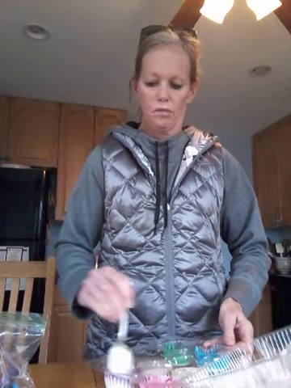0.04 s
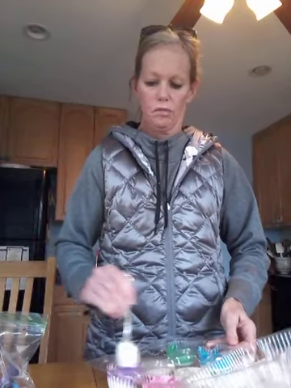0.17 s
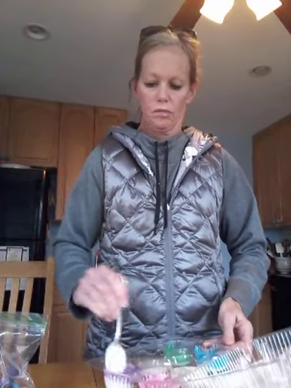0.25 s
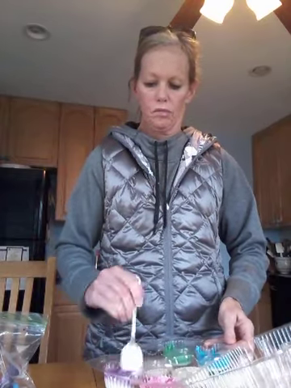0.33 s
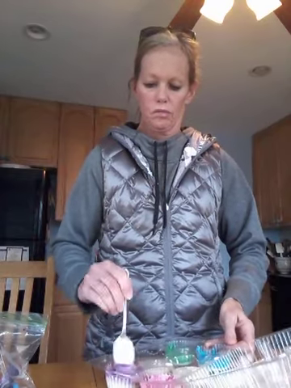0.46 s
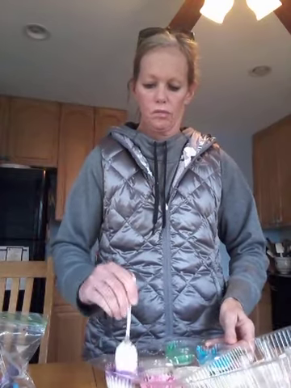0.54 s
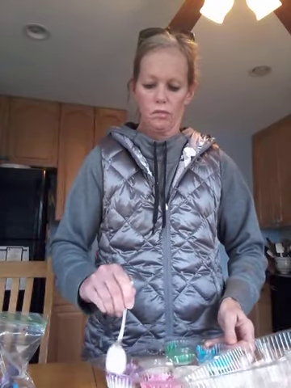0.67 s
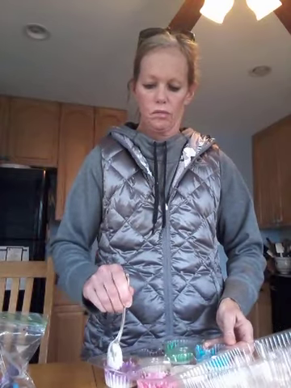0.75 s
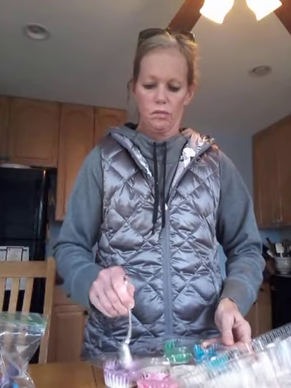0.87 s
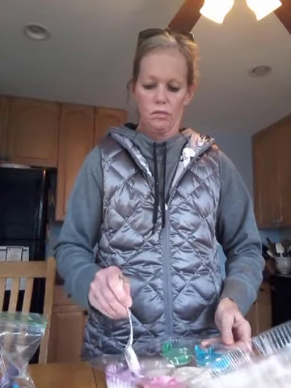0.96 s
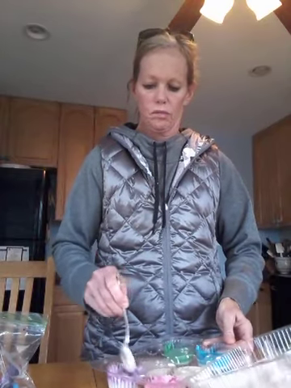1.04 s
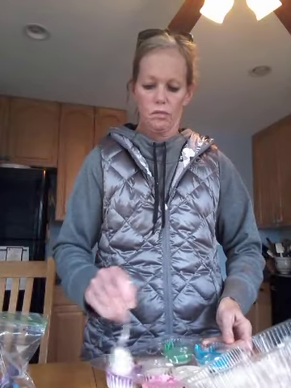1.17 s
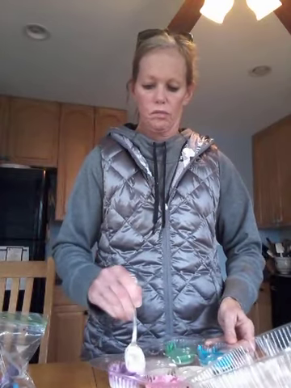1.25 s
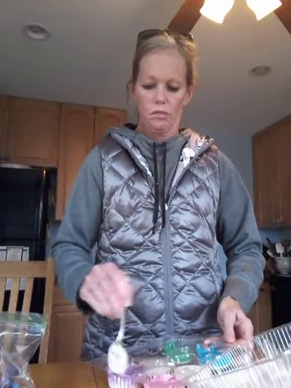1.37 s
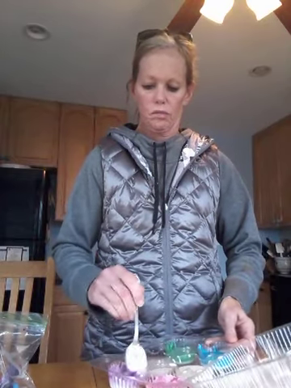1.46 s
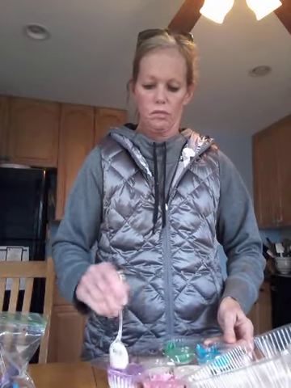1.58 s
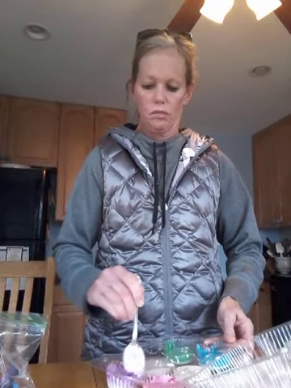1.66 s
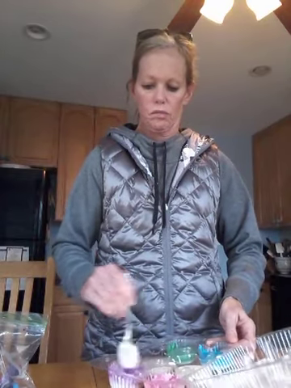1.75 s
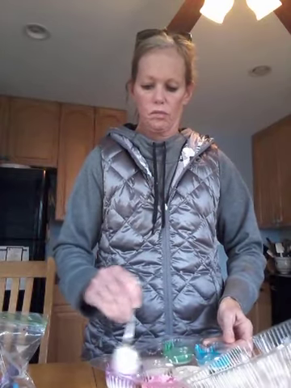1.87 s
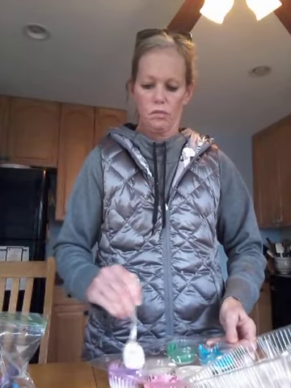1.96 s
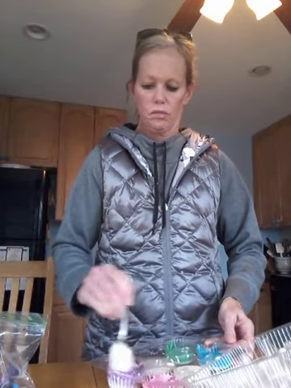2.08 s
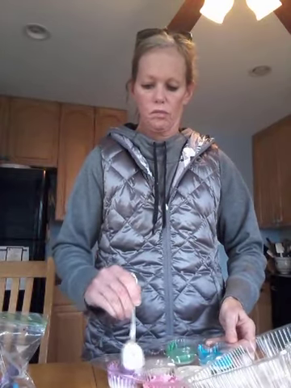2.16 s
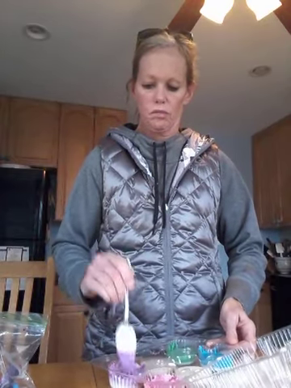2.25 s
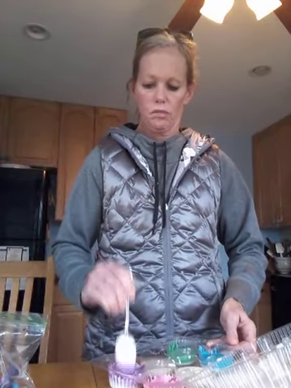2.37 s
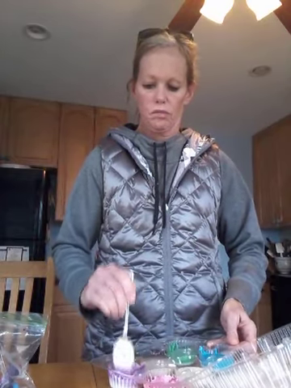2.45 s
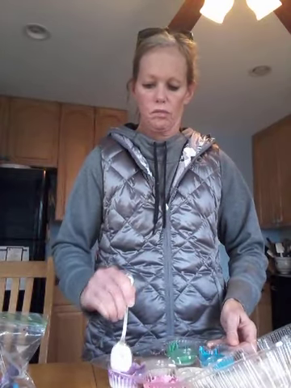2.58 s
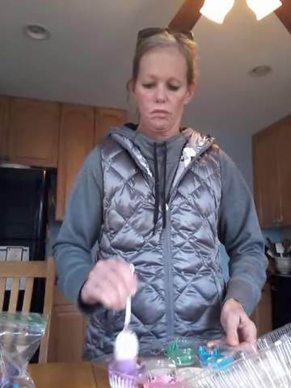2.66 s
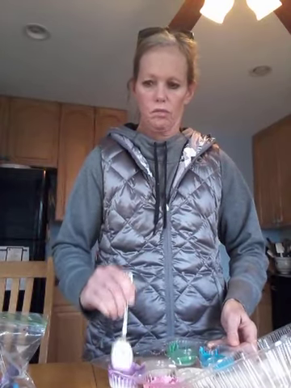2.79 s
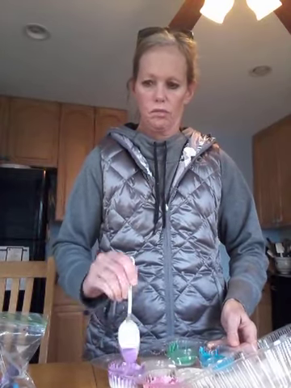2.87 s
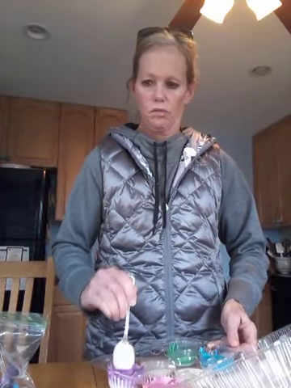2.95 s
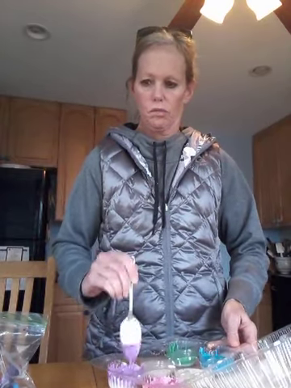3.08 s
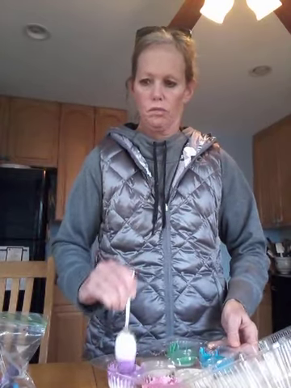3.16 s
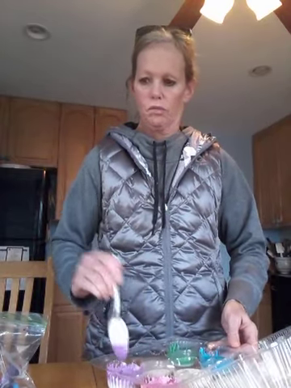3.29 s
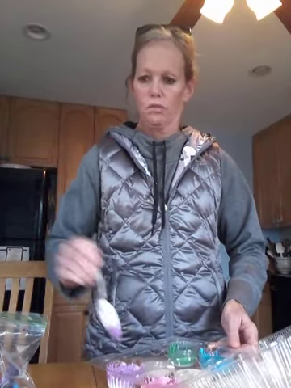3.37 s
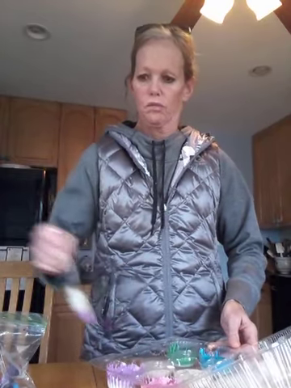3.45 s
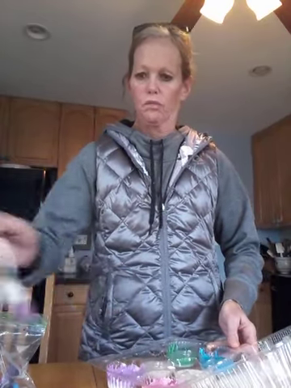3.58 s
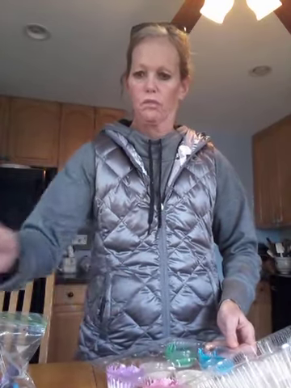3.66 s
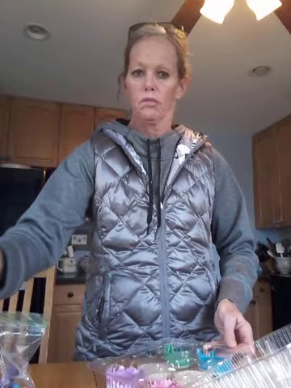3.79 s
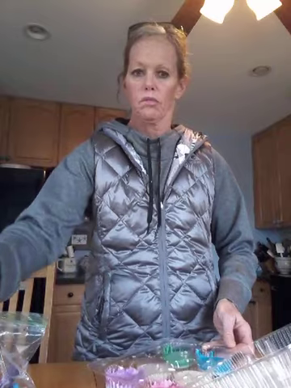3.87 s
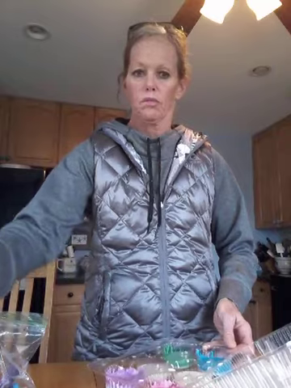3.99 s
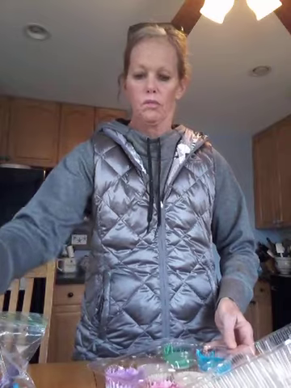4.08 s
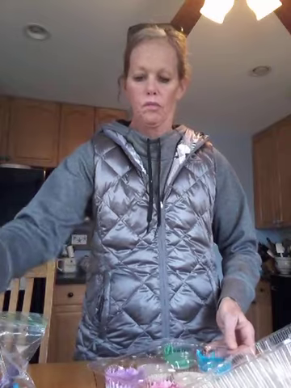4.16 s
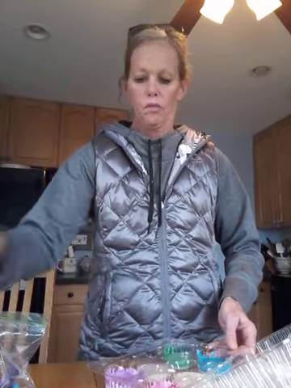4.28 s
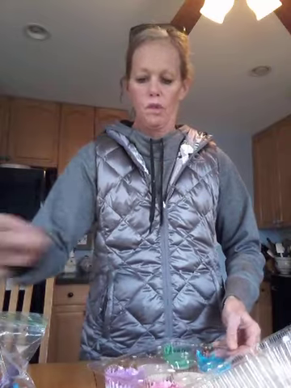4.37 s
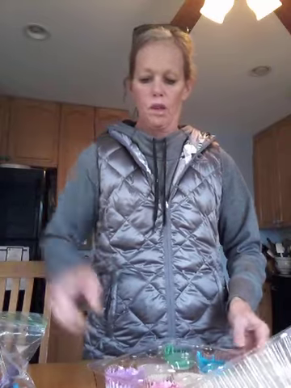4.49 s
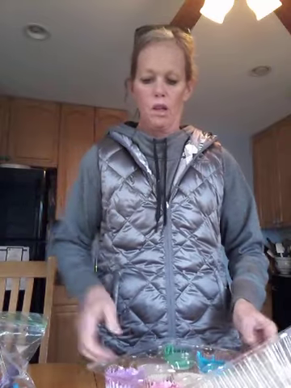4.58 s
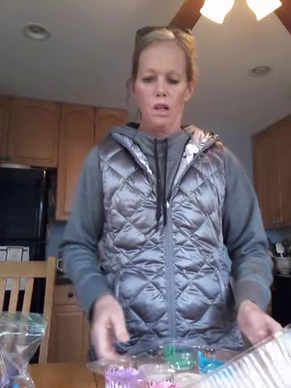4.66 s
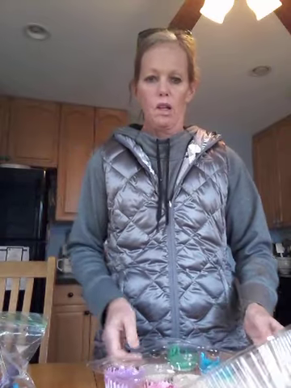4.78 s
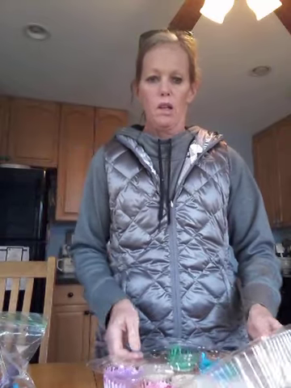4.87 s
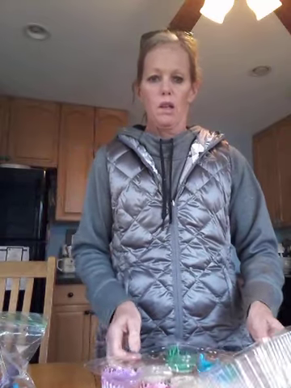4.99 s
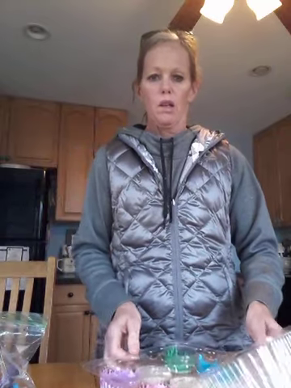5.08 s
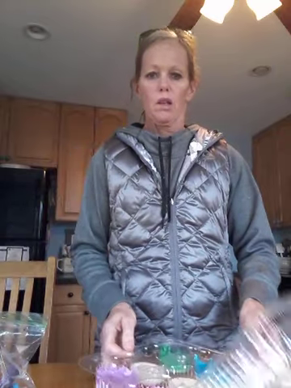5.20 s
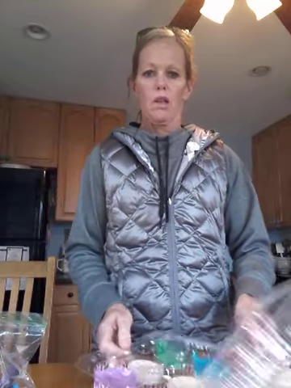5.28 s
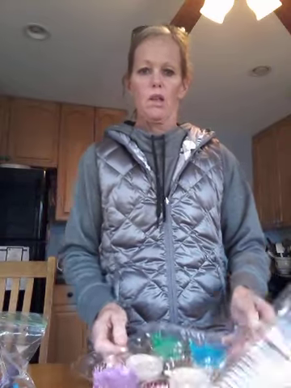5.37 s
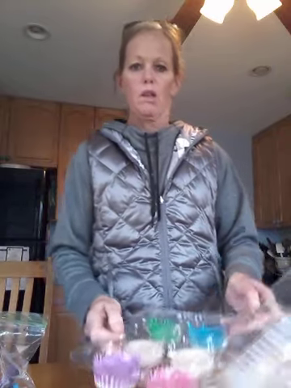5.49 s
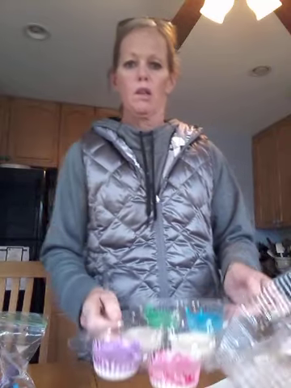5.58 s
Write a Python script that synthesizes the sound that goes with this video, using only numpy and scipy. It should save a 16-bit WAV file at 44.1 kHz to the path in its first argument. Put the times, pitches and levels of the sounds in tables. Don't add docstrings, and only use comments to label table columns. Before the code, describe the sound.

Close to a phone in a hard-walled kitchen, a spoon stirs thick stuff in a pleated paper cup with rapid crisp snaps, rasps and dull thumps. Four loud knocks make the wooden table ring, followed by a brighter rim tap. After a brush of sleeve, the spoon drops farther off, bouncing and rattling. Finally a thin plastic tray ticks and scuffs quietly over a faint appliance hum.

```python
import sys
import numpy as np
from scipy import signal
from scipy.fft import rfft, irfft
from scipy.io import wavfile
from scipy.ndimage import uniform_filter1d

SR = 44100
rng = np.random.default_rng(int(sys.argv[2]) if len(sys.argv) > 2 else 0)


def materialize(psi):
    bounded = np.clip(np.atleast_2d(psi).T, -1, 1)
    quanta = np.round(bounded * 32767).astype(np.int16)
    wavfile.write(sys.argv[1], SR, quanta)


def invert_db(x):
    u = np.asarray(x, float) / 20
    return 10 ** u


N = 248590
BODY_HZ, SNAP_HZ, AIR_HZ = (1200, 2800), (2800, 9000), (9000, 17000)


def band(x, lo_hz, hi_hz):
    sos = signal.butter(2, [lo_hz, min(hi_hz, .45 * SR)], "band", fs=SR, output="sos")
    return signal.sosfilt(sos, x)


def colour(x, points):
    hz, db = np.transpose(points)
    grid_hz = np.arange(1, 2050) * SR / 4096
    cepstrum = irfft(np.interp(np.log(grid_hz), np.log(hz), db) * np.log(10) / 20)
    cepstrum[1:2048] *= 2
    cepstrum[2049:] = 0
    return signal.fftconvolve(x, irfft(np.exp(rfft(cepstrum))))[:len(x)]


def die_away(t, t60):
    return np.exp(-np.log(1000) * t / t60)


def bursts(s, db, ms, rough):
    out, t = np.zeros(N + 4096), np.arange(2048) / SR
    noises = rng.standard_normal((len(s), 2048))
    for at, gain, length, noise in zip(s, invert_db(np.array(db)), np.broadcast_to(ms, len(s)), noises):
        trail = noise * np.exp(-1000 * t / max(length, .05))
        shape = rough * trail / np.sqrt(np.sum(trail ** 2))
        shape[0] -= 1
        start = int(at * SR)
        out[start:start + 2048] += gain * shape / np.sqrt(1 + rough ** 2)
    return out[:N]


def edges(s, db, ms):
    smear, reflection = .6, .22
    out, click = np.zeros(N + 1024), np.eye(1, 1024)[0]
    for at, gain, shares in zip(s, invert_db(np.array(db)), rng.random((len(s), 3))):
        lags = 2 + (shares * ms * SR / 2000).astype(int)
        shape = click - reflection * np.roll(click, lags[2])
        for lag in lags[:2]:
            loop = np.r_[1, np.zeros(lag - 1), -smear]
            shape = signal.lfilter(loop[::-1], loop, shape)
        start = int(at * SR)
        out[start:start + 1024] += gain * shape
    return out[:N]


def contact(strength_db, sharpness):
    fall_db = 13
    return [strength_db - fall_db * (step - sharpness) ** 2 for step in range(3)]


def hits(blows, top_hz, ms, rough, thud_db, body_db, snap_db, air_db):
    s, snap, thud, body, air = np.transpose(blows)[:5]
    force = bursts(s, thud + thud_db, ms, rough)
    low = band(force, 120, top_hz) - band(bursts(s, body + body_db, 3.1 * ms, rough), *BODY_HZ)
    edge = band(edges(s, snap + snap_db, 0.91), *SNAP_HZ) - band(edges(s, air + air_db, 1.2), *AIR_HZ)
    return force, low + edge


def strokes(rows, column):
    attack_s, fade_db_per_s = 0.0025, 285.5
    t, gain = np.arange(N) / SR, 0
    for row in rows:
        start, length = row[:2]
        fade_db = fade_db_per_s * np.maximum(t - start - length, 0)
        gain = gain + np.clip((t - start) / attack_s, 0, 1) * invert_db(row[column] - fade_db)
    return gain


def grains(gain, per_s, spread_db):
    size = rng.standard_normal(N) * invert_db(spread_db * rng.exponential(size=N))
    size = size * (rng.random(N) < per_s / SR)
    return size / np.std(size) * gain


def notes(rows):
    attack_ms = 1.0
    out, t = np.zeros(N + SR // 2), np.arange(SR // 2) / SR
    for s, db, hz, ms in rows:
        swell = die_away(1000 * t, ms) * (1 - np.exp(-1000 * t / attack_ms))
        start = int(s * SR)
        out[start:start + len(t)] += invert_db(db) * swell * np.sin(2 * np.pi * hz * t)
    return out[:N]


def ring(x, modes, shorten):
    t = np.arange(SR) / SR
    body = sum(invert_db(db) * np.sin(2 * np.pi * hz * t) * die_away(t, t60 * shorten) for hz, db, t60 in modes)
    return signal.fftconvolve(x, body)[:N]


def wood(x, t60, top_hz):
    t = np.arange(SR // 2) / SR
    body = band(rng.standard_normal(len(t)), 140, top_hz) * die_away(t, t60)
    return signal.fftconvolve(x, body / np.sqrt(np.sum(body ** 2)))[:N]


# [f/Hz, level/dB, t60/s]
FRAME = [(65, -4, .8), (139, -1, .6)]
# [level/dB, t60/s]
LOW_BOARDS_HZ = [194, 240, 296, 333, 511, 571, 638, 700, 806, 867, 910, 1007, 1115, 1190]
LOW_BOARDS = [(-3.5, .3), (-10.5, 0.49), (-3, 0.39), (-6.5, 0.41), (-5.5, 0.4), (-5, 0.49), (-21.5, 0.79),
              (-21, 1), (-2.5, 0.13), (-10.5, 0.7), (-26.5, 0.4), (-5.5, 0.41), (-11, .4), (-16, 0.33)]
# [level/dB, t60/s]
HIGH_BOARDS_HZ = [1265, 1375, 1416, 1470, 1700, 1770, 1810, 2050, 2175, 2240, 2290, 2350]
HIGH_BOARDS = [(-24, 0.37), (-12.5, 0.76), (-38, 0.65), (-27, 0.44), (-25, 0.32), (-19, 0.24),
               (-14.5, 0.59), (-12, 0.27), (-20, 0.32), (-12, 0.28), (-19.5, 0.44), (-22, 0.27)]


def table(force, frame_db, boards_db, shorten):
    pitches = zip(LOW_BOARDS_HZ + HIGH_BOARDS_HZ, LOW_BOARDS + HIGH_BOARDS)
    boards = [(hz, db + boards_db, t60) for hz, (db, t60) in pitches]
    gaps_hz = rng.uniform(12, 28, size=len(boards)) * (-1) ** np.arange(len(boards))
    twins = [(hz + gap, db - 5, t60) for (hz, db, t60), gap in zip(boards, gaps_hz)]
    frame = [(hz, db + more, t60) for (hz, db, t60), more in zip(FRAME, frame_db)]
    return ring(force, boards + twins + frame, shorten)


# [f/Hz, level/dB per Hz]
HUM = [(26, -47), (45, -10.5), (81, -1), (267, -10.5), (309, -1.5), (406, -19), (633, -16), (681, -15),
       (734, -15), (1430, -16.5), (4450, -23), (6300, -17.5), (9580, -29.5), (15300, -28), (16500, -46)]


def room_tone():
    noise = colour(rng.standard_normal(N), HUM)
    steps = np.repeat(rng.standard_normal(N // 4000 + 1), 4000)[:N]
    drift_db = 1.5 * uniform_filter1d(steps, size=6000)
    return noise / np.std(noise) * invert_db(-53 - 6.5 + drift_db)


# [lowest f/Hz, t60/s, level/dB]
KITCHEN = [(159, 0.38, 1), (267, 0.45, 1), (620, 0.44, 2), (1047, 0.5, -4), (2620, 0.36, -0.5),
           (4970, 0.37, -2.5), (7800, 0.19, -7), (12200, 0.38, -10.5)]
# [delay/ms, level/dB]
ECHOES = [
    (2.0, -9),
    (19.0, -27),
    (26.0, -26),
]


def kitchen(build_ms, wet_db):
    t = np.arange(int(.8 * SR)) / SR
    tail, tops = 0, [row[0] for row in KITCHEN[1:]] + [18000]
    for (lo, t60, db), hi in zip(KITCHEN, tops):
        fall = die_away(t, t60) * (1 - np.exp(-1000 * t / build_ms))
        noise = band(rng.standard_normal(len(t)), lo, hi)
        tail = tail + invert_db(db + wet_db) * noise * fall / np.sqrt(np.sum(fall ** 2))
    tail[0] += 1
    for ms, db in ECHOES:
        start = int(ms * SR / 1000)
        tail[start:start + 24] += invert_db(db) * rng.standard_normal(24) / 5
    return tail


# [t/s, snap level/dB, thud level/dB, body level/dB, air level/dB]
TRAY = [
    (4.4555, -14, -24.5, -16.5, -50),
    (4.6915, -45, -25.5, -25.5, -54),
    (5.0207, -34, -32, -27.5, -51),
    (5.1092, -41.5, -46, -23, -59),
    (5.5373, -45, -56, -45, -37),
    (5.5466, -39, -64, -48, -34),
    (5.566, -42, -45, -47, -35),
    (5.5969, -30, -34.5, -43, -54),
    (5.606, -43, -38, -51, -61),
]
# [f/Hz, level/dB, t60/s]
TRAY_MODES = [(335, -17, 0.043), (493, -19.5, 0.24), (700, -5, 0.086), (878, 4, 0.035), (1370, 0.5, 0.045)]
# [t/s, level/dB, f/Hz,
# t60/ms]
TRAY_NOTES = [(4.457, -49, 67, 300), (4.455, -39, 1104, 29.8), (4.47, -54, 459, 200), (4.69, -45, 638, 40),
              (4.776, -53.5, 920, 30), (4.82, -54, 815, 30), (4.87, -39.5, 448, 40), (4.872, -50, 1130, 30),
              (4.895, -51, 890, 40), (4.974, -46, 904, 30), (5.019, -52, 700, 30),
              (5.106, -46.5, 660, 50.5), (5.15, -59.5, 830, 91.6), (5.597, -56, 189, 60)]
# [t/s, length/s, rasp level/dB, drag level/dB]
REACH = [
    (3.6, 0.076, -62.5, -53),
    (3.72, 0.17, -66.5, -58.5),
    (3.86, 0.0074, -64, -49.5),
    (3.895, 0.05, -86.5, -51),
]
# [t/s, length/s, rasp level/dB, drag level/dB]
SHIFT = [
    (4.471, 0.02, -62, -47),
    (4.69, 0.14, -58.5, -65),
    (4.779, 0.011, -49.5, -44),
    (4.862, 0.0046, -42, -33.5),
    (4.9, 0.088, -58.5, -61),
    (5.02, 0.06, -55, -47),
    (5.1, 0.086, -60.5, -45.5),
    (5.188, 0.016, -51.5, -63),
    (5.531, .05, -76, -76),
    (5.595, 0.0092, -58.5, -49),
]


def tray():
    force, crack = hits(TRAY, 1200, 7.8, 4.3, 9.2, 8.2, 5.6, 14.0)
    force = force + invert_db(-4.5) * grains(strokes(SHIFT, column=3), 3700, 1.6)
    rub = invert_db(1.5) * band(grains(strokes(REACH + SHIFT, column=2), 9600, 1.2), 710, 8700)
    knocks = band(crack + invert_db(-35.0) * ring(force, TRAY_MODES, 0.38), 170, 6100)
    return knocks + rub + notes(TRAY_NOTES)


# [t/s, strength level/dB, sharpness, thud level/dB, ring over snap level/dB]
DROPS = [(3.647, -31, -6, -36, -26), (3.862, -31.5, 0.5, -30, -24), (3.897, -37, 1, -10.5, -19),
         (3.9438, -44, 1, -19, -26), (4.0252, 2, 6.5, 0, -40), (4.029, -0.5, -1.27, -4.5, -40),
         (4.0332, -16.5, -1, -20.5, -46.5), (4.043, -15.5, 0.5, -8.5, -42), (4.051, -2, 5, -20, -36),
         (4.054, -24.5, 0, -18.5, -41), (4.0559, -7, 5.5, -9.5, -42), (4.127, 4.5, 1.65, -3, -14.5),
         (4.149, -29, 4, -14, -16), (4.2558, -1, 1.29, -14, -35), (4.424, -30, -6.5, -37, -32.5)]
# [t/s, level/dB, length/ms]
CHATTER = [
    (4.0237, -17, 3.6),
    (4.028, -18, 3),
    (4.0337, -17, 2.6),
    (4.035, -34, 2.7),
    (4.042, -30, 3),
    (4.0455, -32, 4),
    (4.0498, -22.5, 2.9),
    (4.053, -30, 3.3),
    (4.0575, -45, 2.7),
]
# [f/Hz, level/dB, t60/s]
HANDLE = [(4180, -14, .02), (5610, -13, .012), (6060, -12, .015), (8370, -5, .008), (9320, -5, .008),
          (9860, -6, .008), (10900, -5, .006), (12000, -6, .006)]
SPOON = [(2030, -6, .018), (2880, -3, .018), (4230, -5, .045), (5450, -3, .015), (6560, -8, .025),
         (7770, -8, .03), (9200, -12, .025), (10900, -7, .015)]
COUNTER = [(76.6, -9.5, 0.72), (142.4, -12, 0.78), (182, -3, 0.078), (241.8, -13, 0.67), (340, -6, 0.042),
           (408, -8.5, 0.048), (578, 1.5, 0.054), (780, -2.5, 0.048), (860, -0.5, 0.044), (1128, 0.5, 0.08)]
# [t/s, level/dB, f/Hz, t60/ms]
FALL_NOTES = [(3.875, -40.5, 195, 90), (3.862, -37, 70.6, 180), (4.025, -4, 860, 13.2),
              (4.0252, -14, 1330, 9.8), (4.127, -12, 2880, 18.4), (4.127, -15, 5170, 18),
              (4.256, -20.5, 4960, 21), (4.256, -27, 8500, 19), (4.0255, -27.5, 229, 72),
              (4.029, -19, 413, 35), (4.042, -21.5, 311, 60), (4.044, -23.5, 139.6, 41),
              (4.058, -36.5, 341, 44), (4.148, -24, 2960, 15),
              (4.034, -15, 11600, 13), (4.036, -22.5, 9330, 20), (4.045, -25, 5460, 34),
               (4.0445, -35.5, 5750, 33), (4.049, -19.5, 8250, 23), (4.05, -13.5, 9400, 22),
               (4.128, -22.5, 6760, 25), (4.127, -9.5, 10770, 17), (4.256, -19.5, 2100, 12),
               (4.258, -20, 2910, 12)]


def dropped_spoon():
    s, strength, sharpness, thud, ringing = np.transpose(DROPS)
    body, snap, air = contact(strength, sharpness)
    force, crack = hits(np.transpose([s, snap, thud, body, air]), 1104, 2.0, 1.0, 4.8, 22.3, 6.9, 8.1)
    force = force + invert_db(-9.5) * grains(strokes(REACH, column=3), 760, 1.5)
    skips = bursts(*np.transpose(CHATTER), 6.3)
    rattle = ring(skips, HANDLE, 1) + invert_db(26.5) * band(band(skips, 7600, 15500), 7100, 15000)
    counter = invert_db(-32.0) * ring(force, COUNTER, 0.46)
    metal = ring(bursts(s, snap + ringing, 0.2, 0.26), SPOON, .65)
    return crack + rattle + notes(FALL_NOTES) + counter + metal


# [t/s, strength level/dB, sharpness]
TICKS = [(0.038, -6, 0.88), (0.061, -8, 1.4), (.0748, -13, 1.9), (.093, -11, .9), (.147, -24, 2.1),
         (0.187, -10.5, 1.6), (.325, -5.5, .8), (.378, -21, 1.3), (.3855, -24, 1.8), (.3935, -17, 2),
         (0.3968, -15, 1.3), (.4017, -22, 1.8), (0.4032, -13, .8), (0.413, -25, 2.2), (.7415, -28, 1.8),
         (0.789, -19, 1.4), (1.182, -31, 1.9), (1.2584, -15, 0.9), (1.2724, -29, 2.2), (1.275, -17, 0.77),
         (1.4086, -16, .9), (1.5312, -12, 2.3), (1.538, -7, 2), (1.64, -10, 1.1), (1.9872, -17, 2.4),
         (2.008, -15, 2.1), (3.8752, -33, 2), (4.001, -42, 2.4), (4.136, -5, 0.89), (4.4277, -37, 2),
         (4.548, -37.5, 2)]


def ticks():
    s, strength, sharpness = np.transpose(TICKS)
    snap, air = contact(strength, sharpness)[1:]
    return band(edges(s, snap + 6, .8), 2200, 7000) - band(edges(s, air + 10, 0.44), 7500, 16000)


# [t/s, snap level/dB, thud level/dB, body level/dB, air level/dB]
KNOCKS = [
    (1.257, -56, -15, -52, -70),
    (2.186, -60, -3, -49, -72),
    (2.4697, -7.5, 12, -29, -47),
    (2.6428, -42, -44, -27, -23),
    (2.651, -12.5, 12, -18, -12.5),
    (2.8194, -8, 11.5, 0, -54),
    (3.0253, -5, 9.5, -4, -46.5),
]
# [t/s, snap level/dB, thud level/dB, body level/dB, air level/dB]
LAST_TAP = [
    (3.2321, 2, -7.5, -0.5, -2),
]
# [t/s, level/dB, f/Hz, t60/ms]
RIM_NOTES = [
    (3.232, -16, 2160, 6.7),
    (3.232, -31, 1540, 9.7),
    (3.232, -28, 10700, 6),
]
# [f/Hz, level/dB]
RIM = [(2400, -0.5), (3300, -0.5), (5000, 6.5), (6300, 0.5), (8800, -4), (10500, -3)]


def knocking():
    force, crack = hits(KNOCKS, 1940, 0.88, .33, 6.38, 0, 3.6, 6.3)
    tap = hits(LAST_TAP, 1000, 9.0, .2, 11.7, 12.7, 7.0, 9.9)[1]
    airborne = invert_db(-2.0) * crack + colour(tap, RIM) + notes(RIM_NOTES)
    clutter = invert_db(-25.5) * band(wood(force, 0.29, 7400), 4100, 4700)
    panels = invert_db(-25) * band(band(wood(force, 0.39, 2400), 1650, 2400), 1600, 2600)
    boards = table(force, (-41, -41.5), -45.0, 1.0)
    rattle = invert_db(-9.5) * band(band(wood(force, 0.37, 2200), 92, 2500), 88, 3000)
    return airborne, clutter + boards + panels + rattle


# [t/s, strength level/dB, sharpness (0 dull fold, 1
PLEATS = [(.0034, -15, 1.7), (0.036, -29, 1.5), (0.06, -8, 0.35), (0.07, -8, 0.95), (0.0878, -3, 1.04),
          (0.152, -4.5, 0.64), (0.181, -12.5, 1.9), (.188, -7.5, 0.46), (0.2192, -5.5, 0.94),
          (0.2418, -10, 0.35), (0.255, -6.5, 0.57), (0.2667, -5, 1.45), (.28, -3.5, 0.61),
          (0.291, -4, 0.66), (0.303, -2.5, 1.7), (0.3203, -0.5, 1.62), (0.3679, -12.5, 0.76),
          (.361, -16, 2.5), (0.3887, -2, 0.47), (0.401, -19, 0.42), (.4143, -14, 5.1),
          (0.4238, 0.5, 1.59), (0.579, -25.5, 0.65), (0.6156, -28.5, 0.52),
          (0.68, -8.5, 0.96), (0.7516, -3, 0.82), (0.7835, -14.5, 0.85), (0.7928, -4.5, 0.58),
                (0.8175, -6, 0.47), (0.839, -9.5, 1.25), (0.891, -5, 0.73), (0.8973, -4.5, 0.54),
                (0.9151, -1, 2.5), (0.9938, -12, 0.48), (1.0724, -5, 0.59), (1.0783, -0.5, 0.7),
                (1.138, -10.5, 0.52), (1.1697, -27.5, 1.7), (1.1956, -6, 0.99), (1.216, -14.5, 1.5),
                (1.25, -17.5, 0.75), (1.259, -26, 2), (1.2751, -29, 1.3), (1.2837, 7, 1.13),
                (1.304, 0, 1.57), (1.3319, -6.5, 1.26), (1.383, -8.5, 0.38), (1.412, -17, 0.5),
          (1.5008, -5.5, 0.67), (1.5195, -3, 0.86), (1.532, -40, 1.3), (1.5403, -7.5, 1.2),
               (1.596, 3, 1.39), (1.6133, -4.5, 0.55), (1.7265, -10, 0.43), (1.755, -15.5, 1.64),
               (1.7767, -36, 0.93), (1.8246, -17, 0.93), (1.833, -10, 0.52), (1.8518, -3, 0.64),
               (1.859, -0.5, 2.58), (1.8826, -14, 1.5), (1.8998, 0, 1.49), (1.953, -12, 0.2),
               (1.9644, -11.5, 1.5), (1.986, -14, 0.23), (1.994, -9.5, 1.75), (2.0172, -0.5, 1.93),
               (2.063, -13, 1), (2.0839, -5, 0.62), (2.1095, -9, 0.51), (2.098, -13.5, 1.7),
               (2.1853, -19, 0.74), (2.192, -13, 0.41), (2.214, -29, 1.1), (2.238, -1.5, 2.03)]
# [t/s, effort level/dB]
STIR = [(0, -25.5), (0.128, -47), (.3, -34.5), (.44, -43), (.5, -70), (.7, -69), (.9, -37.5), (1.1, -52),
        (1.28, -39.5), (1.46, -55), (1.61, -61), (1.741, -47.5), (2.1, -40), (2.26, -63.5), (2.45, -72)]
# [t/s, thud level/dB, push length/ms]
THUDS = [(0.009, -32, 16), (0.151, -28, 5.5), (0.259, -32, 15), (0.389, -27.5, 8.5), (0.42, -32, 6),
         (0.683, -32, 24), (0.748, -32.5, 57), (0.89, -42, 8.7), (1.079, -36.5, 38), (1.258, -33, 10),
         (1.383, -30, 3.7), (1.499, -33.5, 11), (1.514, -25, 11), (1.535, -31, 9.7), (1.608, -40, 24),
         (1.724, -25.5, 1), (1.848, -33, 42), (1.96, -27, 24), (1.998, -34.5, 2.8), (2.091, -35, 2.6),
         (2.184, -25, 2.3)]
# [t/s, level/dB, f/Hz, t60/ms]
CUP_NOTES = [(.152, -35, 304, 100), (.152, -35, 493, 34), (.185, -34, 252, 82), (.2, -29, 567, 41),
             (.215, -31.5, 815, 38), (.285, -32, 1050, 34), (.391, -31, 826, 37), (.391, -35, 510, 82),
             (.405, -33, 585, 166), (.44, -29.5, 850, 31), (.682, -43.5, 517, 120), (.747, -32.5, 894, 34),
             (.81, -38, 694, 66), (.889, -37, 899, 34), (1.075, -41, 960, 99), (1.256, -33.5, 186, 91),
             (1.28, -41, 303, 410), (1.38, -45, 302, 93), (1.498, -43.5, 361, 38), (1.513, -32, 521, 69),
             (1.518, -29.5, 164, 65), (1.515, -52, 1010, 30), (1.55, -38.5, 307, 170),
             (1.609, -30, 775, 28), (1.725, -35.5, 520, 85), (1.727, -30, 191, 50), (1.76, -45, 340, 36),
             (1.847, -36, 206, 42), (1.961, -53, 360, 56), (1.996, -36.5, 600, 60), (2.09, -35.5, 294, 66),
             (2.186, -30, 301.6, 170)]
# [t/s, level/dB, f/Hz, t60/ms]
WALL_NOTES = [(.70, -34.5, 874, 43), (.79, -34.5, 1430, 61), (.817, -37, 2320, 32), (.892, -45, 1700, 30),
              (.91, -33, 1650, 44), (1.01, -37.5, 820, 72), (1.078, -28.5, 1700, 66),
              (1.085, -38, 1364, 140), (1.30, -37, 824, 59), (1.383, -34, 850, 50), (1.41, -39, 856, 35),
              (1.501, -26, 2870, 26), (1.596, -28, 2110, 46), (1.613, -31, 2040, 33),
              (1.856, -30, 1480, 61), (2.09, -29.5, 1490, 45), (2.11, -37, 1880, 40),
              (1.285, -28, 2900, 22), (.29, -41, 1420, 44)]


def stirring():
    s, strength, sharpness = np.transpose(PLEATS)
    body, snap, air = contact(strength, sharpness)
    paper = band(band(edges(s, snap + 6, 0.93), *SNAP_HZ), 2760, 11600)
    paper -= band(bursts(s, body + 11, 27.0, 1.5), *BODY_HZ)
    paper -= band(edges(s, air + 10, 0.2), *AIR_HZ)
    flutter = band(bursts(s, np.maximum(snap, air) + 0.49, 0.49, 3.5), 3500, 22000)

    effort = invert_db(np.interp(np.arange(N) / SR, *np.transpose(STIR), right=-120))
    scrape = grains(effort, 2800, 0.89)
    rasp = invert_db(-1) * band(scrape, 1700, 7700) + invert_db(-7.0) * band(scrape, 3000, 5000)

    s, thud, ms = np.transpose(THUDS)
    force = bursts(s, thud + 29, ms, .55) + invert_db(-2.5) * grains(effort, 600, 2.2)
    rasp += invert_db(-5) * band(grains(effort, 700, 2.5), 7500, 15500)
    push = band(band(force, 120, 920), 73, 1000)
    airborne = paper + rasp + notes(CUP_NOTES + WALL_NOTES) + push
    return airborne, flutter + table(force, (-42, -50), -52.5, 1.0) + invert_db(-7.5) * wood(force, 0.52, 990)


# [f/Hz, level/dB]
MIC = [(25, -39), (45, -37), (62, -6.5), (150, 7), (2500, 3.5), (3800, -4), (4800, -2), (5600, 3.5),
       (6300, 11.5), (7300, 0), (11000, -2.5), (15000, -9.5), (16200, -20.5), (17300, -48.5)]


def scene():
    paper, pushed = stirring()
    crack, struck = knocking()
    # sound, ms for the tail to build up, tail level in dB
    spots = [(paper, 2.5, -1.5), (crack, 2.5, .3), (dropped_spoon(), 2.2, -.3), (tray(), 2.5, .3)]
    air = sum(signal.fftconvolve(sound, kitchen(ms, wet_db))[:N] for sound, ms, wet_db in spots)
    air = air + signal.fftconvolve(ticks(), kitchen(2.5, -2.5))[:N]
    return (colour(air + pushed + struck, MIC) + room_tone())[None]


def top_cut(x):
    return signal.sosfilt(signal.butter(12, 17330, fs=SR, output="sos"), x)


def record(dry):
    limited = np.tanh(0.96 * dry) / 1.3
    sos = signal.cheby2(6, 30, (30, 17700), "band", fs=SR, output="sos")
    mix = signal.sosfilt(sos, limited)
    return top_cut(mix)


dry = scene()
out = record(dry)
materialize(out)
```